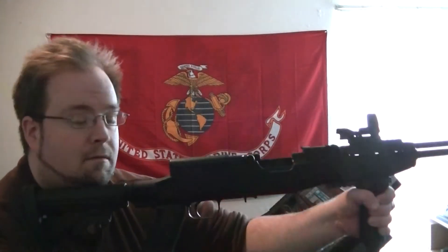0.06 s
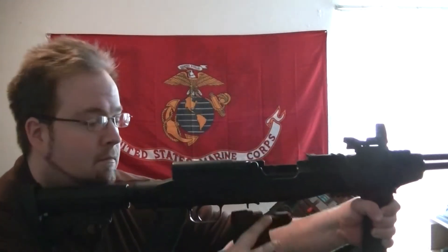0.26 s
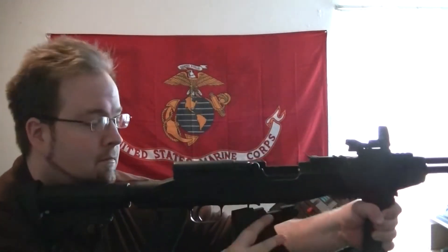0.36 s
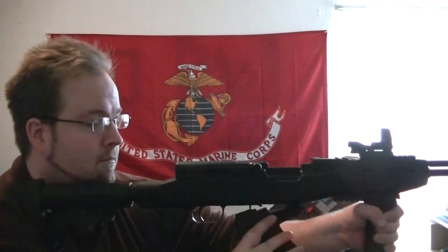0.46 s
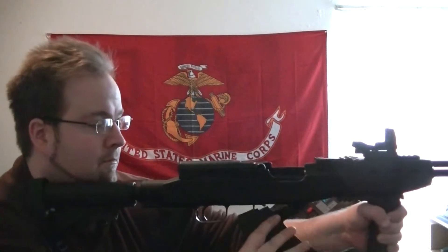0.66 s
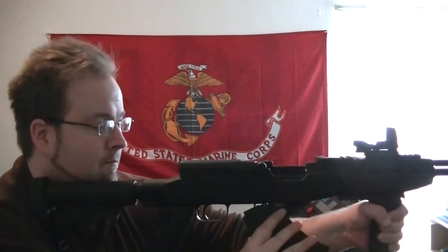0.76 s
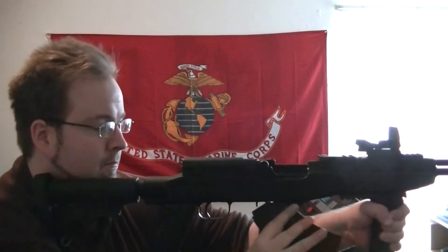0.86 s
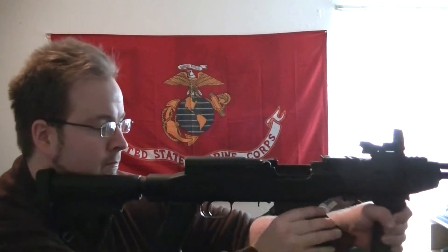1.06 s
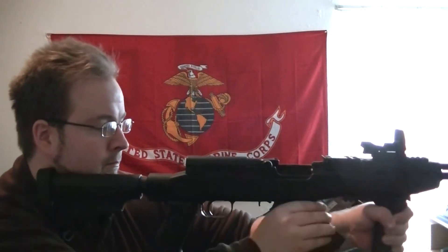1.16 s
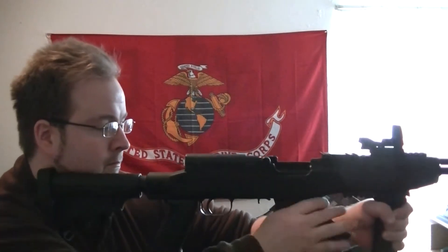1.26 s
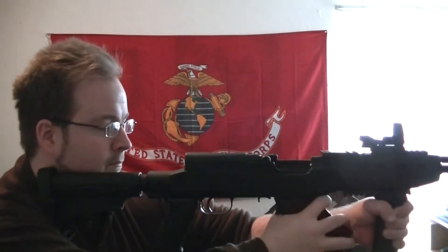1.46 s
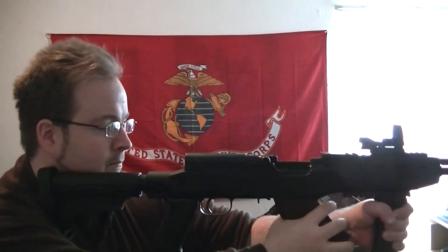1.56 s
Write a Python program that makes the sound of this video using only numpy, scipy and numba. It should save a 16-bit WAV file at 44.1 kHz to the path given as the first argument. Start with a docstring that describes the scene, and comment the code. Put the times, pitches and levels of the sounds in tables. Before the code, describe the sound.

Close rifle handling: a sharp, loud smack on the magazine, a short gap, a busy run of metallic clicks and sliding rattles, then softer taps, over faint room tone with a short indoor echo.

```python
"""A rifle magazine is slapped, worked into its well and tapped in a small quiet room, close to a camera.
Each contact excites decaying modes of the hollow magazine and the stock, and a noisy metal crack.
Between contacts, sliding grains ring the magazine under a hiss, with a narrow metal scrape.
The room adds a short dense tail, a steady tone and a low hum of varying level.
The camera's limiter holds the loudest slap down."""
import sys
import numpy as np
from scipy import signal
from scipy.fft import rfft, irfft
from scipy.io import wavfile
from scipy.ndimage import uniform_filter1d
from numba import njit

SR = 44100
rng = np.random.default_rng(int(sys.argv[2]) if len(sys.argv) > 2 else 0)


def unload_wav(signal):
    """Save mono or channel-first audio to the path in sys.argv[1] as 16-bit WAV at rate SR, clipped to [-1, 1]."""
    wavfile.write(
        sys.argv[1],
        SR,
        np.round(np.clip(np.atleast_2d(signal).T, -1, 1) * 32767).astype(np.int16),
    )


N = 70560  # samples

# modes of the hollow magazine: (frequency [Hz], relative level [dB], t60 [s])
MAGAZINE_MODES = [(528, 7, 0.022), (619.6, 8, 0.021), (713, 2.5, 0.028), (849, 0.5, 0.012),
                  (1107, -11.5, 0.07), (1182.7, -15.5, 0.15), (1200, -8, 0.07), (1327, -1.5, 0.035),
                  (1361, -15.5, 0.2), (1515, -3.5, 0.037), (1778, 1, 0.017), (2076, 2.5, 0.02),
                  (2174, 2, 0.02), (2380, -3, 0.043), (2760, -5.5, 0.012), (3000, -3, 0.016)]
# spectrum of metal-on-metal noise: (frequency [Hz], gain [dB])
METAL_COLOUR = [(880, -7.5), (1500, -0.5), (3220, 2.5), (3960, -0.5), (4640, -2.5), (5070, -4), (6560, -8),
                (12200, -20.5), (16000, -37)]
TAP_MS = 0.24  # time scale of a light tap


def undb(db):
    """Level in decibels to amplitude ratio."""
    return 10 ** (np.asarray(db) / 20)


def unit(x):
    """Normalization to unit RMS."""
    return x / np.sqrt(np.mean(x ** 2))


def colour(x, table):
    """Spectral shaping: gain points (Hz, dB) are joined along log frequency."""
    frequency = np.maximum(np.arange(N // 2 + 1) * SR / N, 1)
    hz, db = np.array(table).T
    gain_db = np.interp(np.log(frequency), np.log(hz), db)
    return irfft(rfft(x) * undb(gain_db), N)


def lift(x, db):
    """Shelving filter: a scaled first-order high-pass part raises or lowers the treble."""
    treble = signal.sosfilt(signal.butter(1, 6370, "high", fs=SR, output="sos"), x)
    return x + (undb(db) - 1) * treble


def ring(x, hz, t60):
    """Damped resonator: one exponentially decaying sinusoidal mode, about peak 1 for a unit click."""
    radius = np.exp(-np.log(1000) / (max(t60, .003) * SR))
    angle = 2 * np.pi * hz / SR
    return signal.lfilter([0, np.sin(angle)], [1, -2 * radius * np.cos(angle), radius ** 2], x)


def soften(x, ms):
    """Contact force pulse of unit area: a longer blow excites less treble."""
    t = np.arange(256) / SR / (ms / 1000)
    pulse = t * np.exp(-np.e * t)  # peaks at ms / e
    return signal.lfilter(pulse / pulse.sum(), 1, x)


def near_db(hz, centre_hz, octaves):
    """Selective excitation: modes near the centre of a blow ring most, 6 dB down one spread away."""
    return -6 * (np.log2(hz / centre_hz) / octaves) ** 2


def burst(shape):
    """Noise with a set envelope and a nearly flat spectrum, reached by alternating projections."""
    x = rng.standard_normal(len(shape))
    for _ in range(6):
        spectrum = rfft(np.sign(x) * shape)
        x = irfft(spectrum / (np.abs(spectrum) + 1e-12), len(shape))
    return np.sign(x) * shape


def slide():
    """Stick-slip friction: random grains ring the magazine modes under a treble-rich hiss."""
    # parts sliding: (time [s], ring level [dB], hiss level [dB])
    levels = [(0, -56, -63.5), (0.098, -65, -71), (.43, -49.5, -60), (.52, -40.5, -70), (.75, -40.5, -87),
              (.84, -38, -62), (.96, -40, -53), (1.022, -32, -76), (1.169, -50.5, -59.5), (1.298, -48, -60),
              (1.379, -60, -100), (1.53, -59.5, -79), (1.6, -47.5, -51)]
    grains_per_s, grain_spread_db = 790, 1
    s, ring_db, hiss_db = np.array(levels).T
    t = np.arange(N) / SR
    grains = (rng.random(N) < grains_per_s / SR) * rng.standard_normal(N)
    grains = grains * undb(grain_spread_db * rng.exponential(size=N))
    soft_grains = soften(grains, TAP_MS)
    body = 0
    for k, (hz, db, t60) in enumerate(MAGAZINE_MODES):
        # sustained contact halves the decay time
        body = body + (-1) ** k * undb(db) * ring(soft_grains, hz, t60 / 2)
    hiss = colour(unit(grains) + rng.standard_normal(N), METAL_COLOUR)
    hiss = unit(lift(hiss, 31))
    return undb(np.interp(t, s, ring_db)) * unit(body) + undb(np.interp(t, s, hiss_db)) * hiss


def scrape():
    """Resonance-filtered friction noise: metal dragged over metal swells briefly out of a faint hiss."""
    # thin metal scrape: (start [s], length [s], centre [Hz], width setting [Hz], level before gate [dB])
    drag = (0.455, 0.075, 4750, 450, -54)
    s, length, hz, width_hz, db = drag
    t = np.arange(N) / SR
    times = [s, s + length / 10, s + length, s + 2 * length]
    gate = np.interp(t, times, [0.046, 0.84, 0.55, 0.075])  # the end values hold outside
    return undb(db) * gate * unit(ring(rng.standard_normal(N), hz, 1.9 / width_hz))


def tone():
    """Stationary coloured noise: the still air of the room."""
    # spectrum of the room tone: (frequency [Hz], gain [dB])
    air_colour = [(25, -0.5), (50, 19.5), (100, 3.5), (200, -3), (400, -16.5), (700, -13.5), (1330, -11.5),
                  (1600, -30), (4000, -28.5), (12200, -41.5), (16000, -54)]
    return undb(-41.5) * unit(colour(rng.standard_normal(N), air_colour))


def hum():
    """Narrow-band noise: a lightly damped 110 Hz resonance driven by noise, with varying level."""
    # low hum: (time [s], level [dB])
    levels = [(0, -42), (0.192, -41.5), (.4, -50), (1.4, -50.5), (1.519, -48.5), (1.6, -51)]
    level_db = np.interp(np.arange(N) / SR, *np.array(levels).T)
    return undb(level_db) * unit(ring(rng.standard_normal(N), 110, 1.4))  # t60 1.4 s


def knocks():
    """Modal impact: chattering taps ring the magazine, a push thuds the stock, and noise cracks."""
    # contacts: (time [s], ring level [dB], ring centre [Hz], ring spread [octaves], thud level [dB],
    # thud centre [Hz], crack level [dB], crack treble lift [dB], contact length [ms])
    contacts = [(0.2051, -13.5, 930, 0.53, -3, 435, -36, 8, 7.7),
                (.2080, 7.5, 870, 0.82, 13, 339.6, 0, 13, 3.77),
                (0.306, -13, 1200, 0.47, -31, 500, -17, 0.5, 4),
                (.443, -26, 1270, 0.79, -37.5, 298, -44, 5, 2.2),
                (0.45, -30.5, 1490, .6, -44, 300, -50, 5, 2.2),
                (.461, -30, 1590, 0.77, -44, 295, -56, -16, 4.5),
                (.521, -28.5, 1070, 0.51, -39, 390, -62, 1, 6.7),
                (.544, -31, 1380, .6, -24, 400, -24, -21, 0.86),
                (0.5541, -19.5, 1120, 0.75, -47, 413, -27, -18, 1.9),
                (.562, -26.5, 1320, 0.88, -40, 413, -35, -18, 3.4),
                (.590, -50, 915, .6, -17.5, 420, -60, -3, 4),
                (.596, -19, 1450, 0.57, -12.5, 160, -29, 15, 9.8),
                (.602, -32, 1530, 0.34, -17.5, 420, -11, -5.5, 6),
                (0.613, -38, 1500, 0.48, -24, 110, -20, -17, 2.5),
                (.671, -10.5, 1580, 0.56, -21.5, 430, -23, -22, 3.8),
                (0.681, -17, 1520, 0.77, -53, 400, -25, -19, 2.4),
                (0.683, -31, 1390, 1, -57, 400, -35, -10, 0.85),
                (0.701, -29, 1390, .3, -42, 400, -47, -10, 7.3),
                (.776, -21.5, 1380, 0.7, -36.5, 307, -22.5, -27, 5.3),
                (.791, -25, 1320, 0.77, -37.5, 300, -27, 3, 2.7),
                (.832, -22.5, 1200, 0.77, -56, 300, -41, -16, 1.3),
                (.853, -17.5, 960, 0.65, -41, 456, -24.5, -5, 2),
                (.865, -16.5, 1200, .5, -57, 400, -28.5, -4, 3.7),
                (.872, -28, 1990, 0.26, -50, 400, -5, -3, 2.44),
                (0.874, -0.5, 1156, 0.061, -45, 400, -43, -10, 1.8),
                (.901, -20, 1170, 0.42, -35, 300, -36, -26, 3.9),
                (0.9259, -14, 1000, 0.64, -18, 350, -12.5, -30, 1.7),
                (.932, -17.5, 1400, 0.39, -55, 350, -33, -20, 2),
                (.983, -21.5, 1400, 0.77, -24, 170, -34, 10, 19),
                (0.9998, -34, 1430, .6, -12.5, 170, -29, -7, 8.9),
                (1.031, -7.5, 1200, 1.11, -48, 490, -15.5, -6, 2.4),
                (1.037, -10, 1310, 0.73, -42, 460, -55, -1, 1.7),
                (1.043, -20, 1330, 1.1, -38, 450, -37, 5, 0.82),
                (1.050, -29, 1580, 1.1, -29, 420, -45, -9, 6.3),
                (1.062, -20.5, 1280, 1.03, -28, 420, -47, -9, 2.4),
                (1.073, -25, 1210, 0.77, -22.5, 416, -50, -1, 2.5),
                (1.101, -29, 1300, 0.33, -22, 370, -58, -5, 3),
                (1.132, -26.5, 1230, 0.77, -38, 296, -28, 1, 1.6),
                (1.211, -26.5, 1490, 0.41, -41, 397, -54, -5, 0.48),
                (1.265, -33.5, 1055, 1.1, -38, 400, -47.5, 14.5, 1.3),
                (1.292, -36.5, 1290, 0.77, -44, 298, -50, 13, 2.9),
                (1.3241, -18.5, 1270, 0.88, -43, 391, -31.5, -22, 1.43),
                (1.332, -20.5, 1460, 0.2, -40, 405, -50, -5, 1.2),
                (1.351, -28.5, 1500, .6, -50, 400, -54, -19, 1.8),
                (1.466, -29.5, 1420, 0.33, -58, 395, -48, -4, 10.4),
                (1.556, -38, 1410, 0.41, -57, 294.5, -54, 10, 28),
                (1.575, -23, 1500, 0.62, -57, 412, -51.5, 9, 6.8),
                (1.584, -28, 1096, 0.71, -57, 406, -43, 6, 2.1)]
    # modes of the stock: (frequency [Hz], relative level [dB], t60 [s])
    stock_modes = [(91.5, 11.5, 0.14), (160, -8.5, 0.032), (222, -14, 0.041), (273.4, 14, 0.012),
                   (350, -17.5, 0.069), (420, -1, 0.048)]
    # direction in which each magazine mode starts moving: one sign per mode
    polarity = [1, -1, 1, -1, 1, 1, 1, 1, 1, -1, 1, -1, 1, -1, 1, -1]
    contacts_per_s, chatter_db = 1800, -11
    scatter_db, detune = 2, 0.005  # random deviation of each magazine mode; detune is a fraction
    push_ms, thud_octaves = 0.7, 0.2
    size = 8192
    t = np.arange(size) / SR
    body, crack = np.zeros(N + size), np.zeros(N + size)
    # the light shell radiates little bass
    shell = signal.butter(2, 785, "high", fs=SR, output="sos")
    push = soften(1. * (t == 0), push_ms)
    for s, ring_db, ring_hz, spread, thud_db, thud_hz, crack_db, lift_db, ms in contacts:
        i = int(s * SR)
        length = max(ms, .2) / 1000
        taps = (rng.random(size) < contacts_per_s / SR) * rng.standard_normal(size)
        taps = taps * np.exp(-t / length) * undb(chatter_db)
        taps[0] = 1  # first contact
        taps = taps / np.sqrt(np.sum(taps ** 2))
        taps = signal.sosfilt(shell, soften(taps, TAP_MS))
        for sign, (hz, db, t60) in zip(polarity, MAGAZINE_MODES):
            level_scatter, pitch_scatter = rng.standard_normal(size=2)
            mode_db = ring_db + db + near_db(hz, ring_hz, max(spread, .1)) + scatter_db * level_scatter
            body[i:i + size] += sign * undb(mode_db) * ring(taps, hz * (1 + detune * pitch_scatter), t60)
        for hz, db, t60 in stock_modes:
            mode_db = thud_db + db + near_db(hz, thud_hz, thud_octaves)
            body[i:i + size] += undb(mode_db) * ring(push, hz, t60)
        # the crack peaks at half the contact length
        shape = np.e * t / length * 2 * np.exp(-2 * t / length)
        crack[i:i + size] += lift(burst(shape) * undb(crack_db), lift_db)
    return body[:N], colour(crack[:N], METAL_COLOUR)


def room(x):
    """Diffuse reverberation: convolution with dense noise that decays fastest in the highest band."""
    # reverberation: (band centre [Hz], relative level [dB], t60 [s])
    bands = [(119.5, -1, 0.27), (268, -2.5, 0.27), (500, -1.5, 0.31), (1000, 0, 0.29), (1903, 2.5, 0.25),
             (3610, 1.5, 0.25), (7260, 4, 0.24), (15000, -3, 0.17)]
    build_up_s, even_hz, broad_hz = 0.002, 35, 500
    t = np.arange(SR // 2) / SR
    tail = 0
    for hz, db, t60 in bands:
        edges = [hz / np.sqrt(2), hz * np.sqrt(2)]
        octave = signal.butter(2, edges, "band", fs=SR, output="sos")
        band = signal.sosfilt(octave, rng.standard_normal(len(t)))
        tail = tail + band * undb(db - 60 * t / t60)
    # flatten narrow peaks towards the broad spectrum; bins are 1 Hz apart
    spectrum = rfft(tail, SR)
    power = np.abs(spectrum) ** 2 + 1e-12
    broad = uniform_filter1d(power, size=broad_hz)
    narrow = uniform_filter1d(power, size=even_hz)
    tail = irfft(spectrum * np.sqrt(broad / narrow), SR)[:len(t)]
    tail = tail * (1 - np.exp(-(t / build_up_s) ** 2))
    tail = tail / np.sqrt(np.sum(tail ** 2))
    return signal.fftconvolve(x, tail)[:N] * undb(-1)


def scene():
    """Mid-side superposition: direct sounds in the centre, independent room sound at the sides."""
    # side signal: (frequency [Hz], gain [dB])
    side_colour = [(60, -14), (110, -26), (200, -20.5), (380, -24.5), (700, -26.5), (1290, -21.5),
                   (2380, -19.5), (4400, -18.5), (8120, -21), (15000, -59)]
    body, crack = knocks()
    rub = slide() + scrape()
    sent = undb(-8) * body + crack + rub  # ring and thud excite the room less
    mid = body + crack + rub + room(sent) + tone() + hum()
    side = colour(np.sqrt(2) * room(sent) + tone(), side_colour)
    return np.array([mid + side, mid - side])


@njit
def follow(x, up, down):
    """Envelope detection: one-pole smoothing with separate rates for rise and fall."""
    e, y = 1e-6, np.empty(len(x))
    for i in range(len(x)):
        e += (x[i] - e) * (up if x[i] > e else down)
        y[i] = e
    return y


def record(dry):
    """Dynamic compression: the camera's limiter reacts late; peaks are rounded, bass and top cut."""
    limit_db, ratio, attack_s, release_s = -18, 7.7, 0.0043, 0.019
    low_cut_hz, top_hz = 168.6, 16400
    loudest = np.abs(dry).max(axis=0)
    envelope = follow(loudest, 1 / (attack_s * SR), 1 / (release_s * SR))
    gain = np.minimum(1, undb(limit_db) / envelope) ** (1 - 1 / ratio)
    rounded = np.tanh(dry * gain)
    thin = signal.sosfilt(signal.butter(3, low_cut_hz, "high", fs=SR, output="sos"), rounded)
    return signal.sosfilt(signal.ellip(10, .2, 80, top_hz, fs=SR, output="sos"), thin)


dry = scene()
out = record(dry)
unload_wav(out)
```